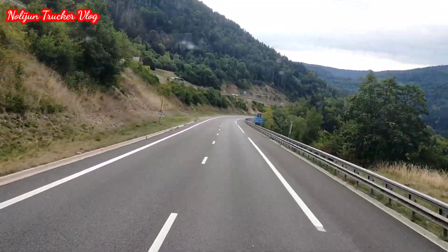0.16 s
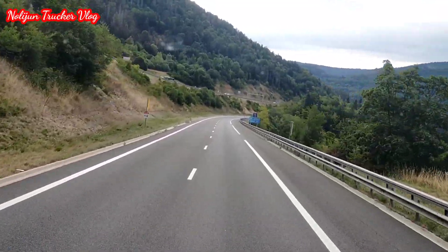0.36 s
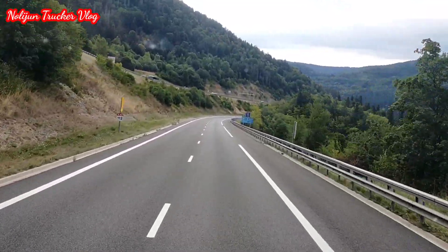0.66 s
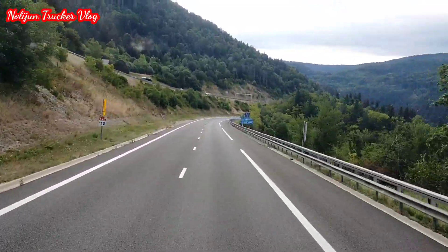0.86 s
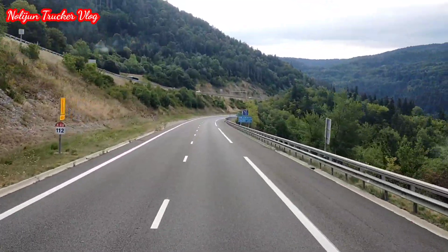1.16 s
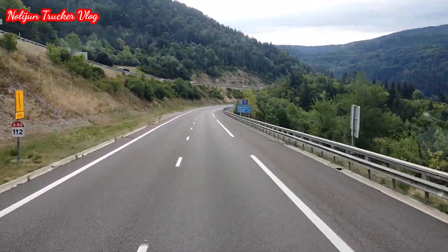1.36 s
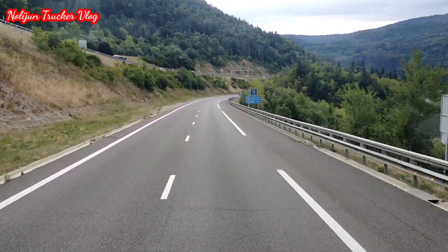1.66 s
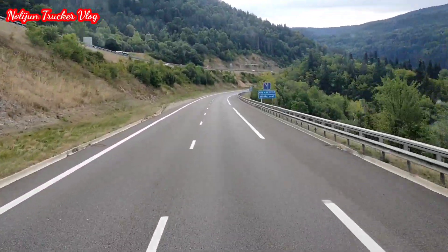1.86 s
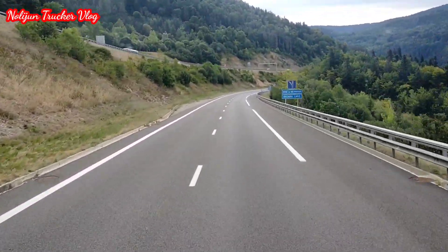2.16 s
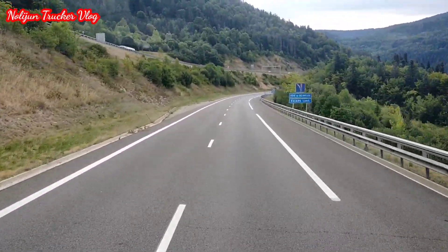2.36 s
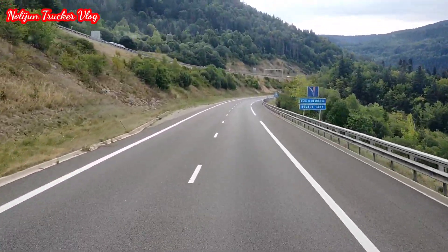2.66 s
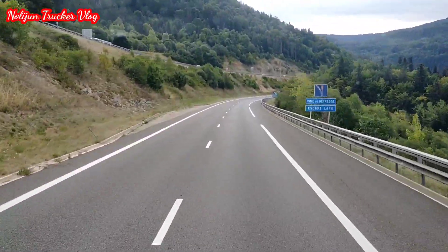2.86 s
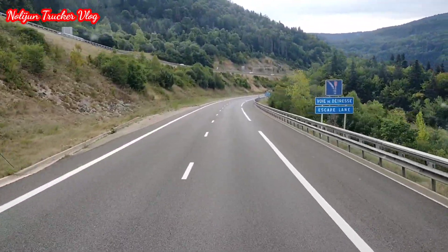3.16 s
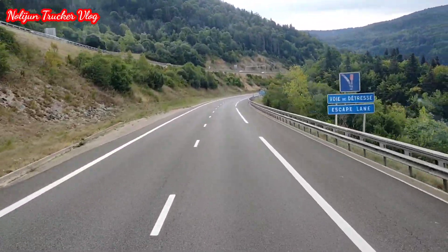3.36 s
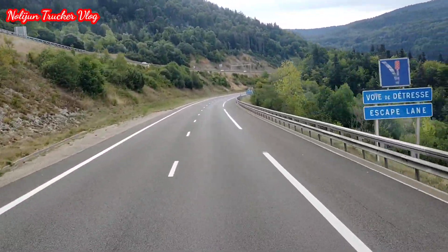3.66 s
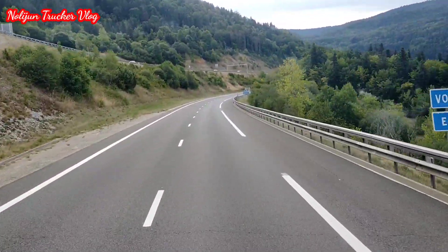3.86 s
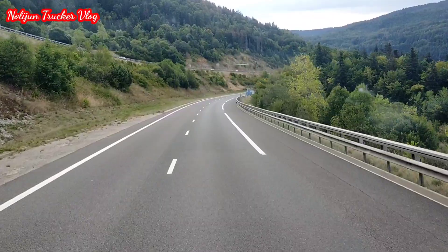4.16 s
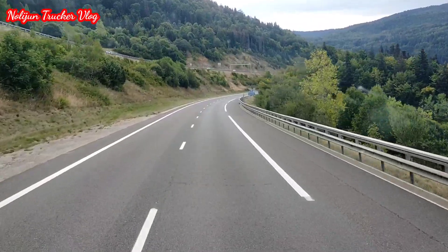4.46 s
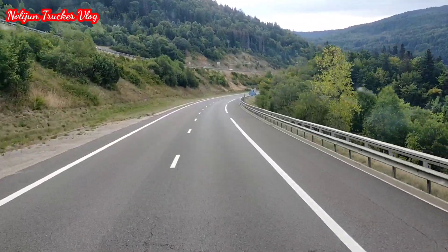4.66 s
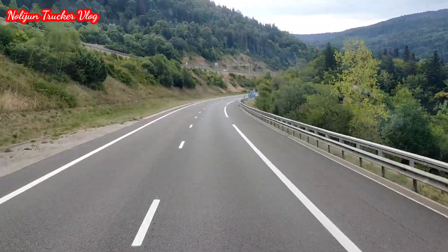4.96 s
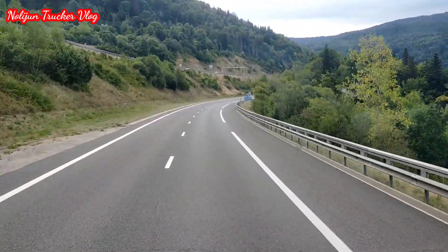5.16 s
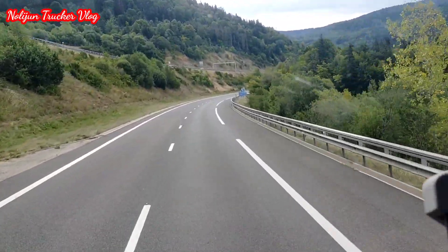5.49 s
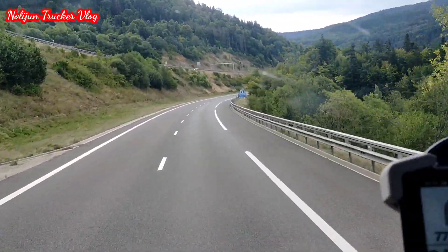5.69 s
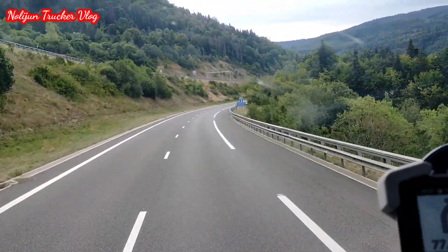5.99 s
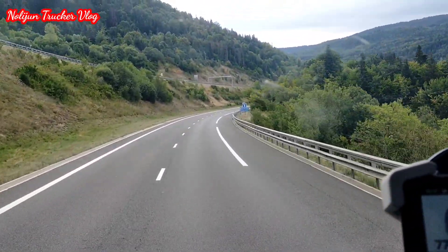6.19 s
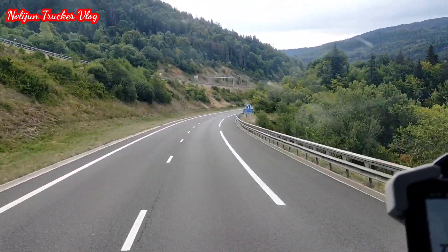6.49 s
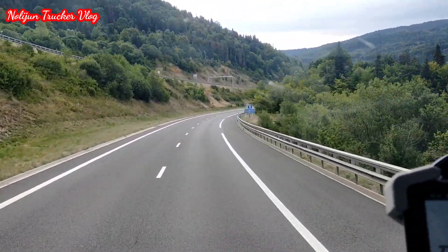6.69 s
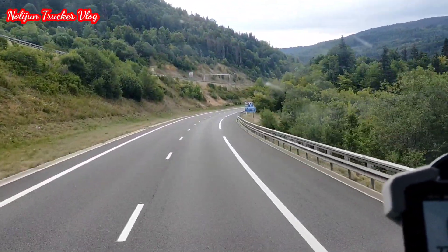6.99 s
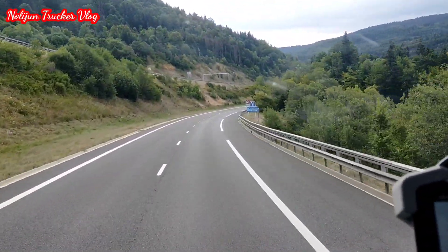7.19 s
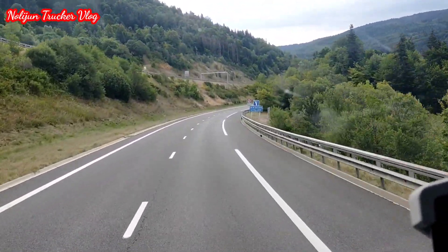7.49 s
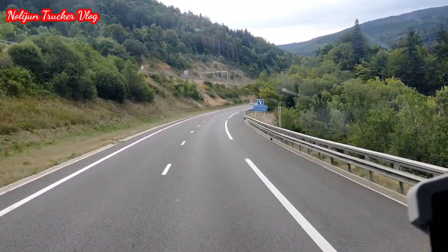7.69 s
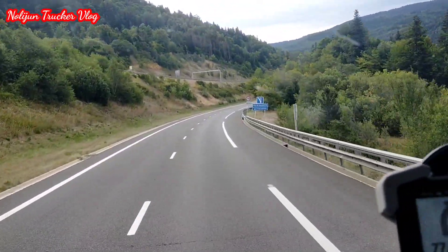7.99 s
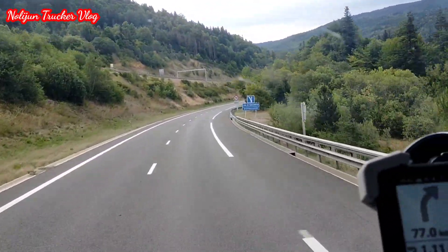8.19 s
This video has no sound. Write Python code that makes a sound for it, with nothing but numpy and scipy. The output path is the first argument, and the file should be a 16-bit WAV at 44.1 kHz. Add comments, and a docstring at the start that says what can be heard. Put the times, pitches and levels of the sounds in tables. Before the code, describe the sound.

Close cab interior, single-channel sound, windows apparently shut. Deep tyre and road rumble runs throughout. After an opening bump, the diesel's low boom lets go and its pitch sweeps upward for about a second, settling into a strong, buzzing engine-brake drone with muffled roar and mechanical clatter. Cloth-like rustles and scattered dry trim ticks sit close by, while gear whines swell faintly and road noise eases later.

```python
"""Inside the cab of a heavy truck rolling down a long hill: the tyres rumble, then ease on smoother asphalt.
A short burst of noise opens the scene; soft rustles follow as the diesel blips from about 1150 to 1900 rpm.
The engine brake builds to a steady drone with a thin turbo whistle, the driveline hums and trim ticks.
Hisses and rumbles are noise shaped by a spectrum; hums, whines and the drone are sines tied to speed."""
import sys
import numpy as np
from scipy import signal
from scipy.fft import rfft, irfft, next_fast_len
from scipy.io import wavfile
from scipy.ndimage import uniform_filter1d, map_coordinates

SR = 44100
rng = np.random.default_rng(int(sys.argv[2]) if len(sys.argv) > 2 else 0)


def digitize_waveform(pressure):
    """Quantize a signal to 16-bit integers and store it at the path in sys.argv[1].

    Rows of a 2-D input are taken as channels; values are limited to [-1, 1].
    """
    field = np.atleast_2d(pressure).T
    bounded = np.clip(field, -1, 1)
    quanta = np.round(bounded * 32767).astype(np.int16)
    wavfile.write(sys.argv[1], SR, quanta)


N = 367794
TIME = np.arange(N) / SR  # seconds

# Spectra of the noises, as shapes that are levelled later. Columns: pitch_hz, level_db (per Hz)
ROAD_SPECTRUM = [(15, -2.5), (28, -3), (42, -3.5), (70, -1.5), (100, -5.5), (140, -6.5), (180, -12),
                 (240, -16.5), (285, -22.5), (350, -20.5), (600, -26.5), (700, -28.5), (900, -28.5),
                 (1250, -31.5), (2500, -45), (4500, -62)]
AIR_SPECTRUM = [(4000, -12.5), (5000, -6.5), (6500, -5), (7500, -9), (9000, -15.5), (10500, -14.5),
                (13500, -11.5), (15500, -12)]
RUSTLE_SPECTRUM = [(2500, -14), (4500, 6.5), (7500, 8.5), (9500, -4), (13000, 0.5), (15500, -4),
                   (16500, -12)]
BURST_SPECTRUM = [(200, -11), (700, 1), (1300, -5), (2300, 0.5), (4000, -10), (6500, -17.5), (13000, -18),
                  (17000, -24)]
ROAR_SPECTRUM = [(60, -17), (110, -6.5), (140, -1), (180, -10), (270, -18), (340, -9), (530, -17),
                 (900, -18), (1100, -20.5), (1500, -23.5), (2200, -22), (2880, -22), (3150, -38),
                 (3700, -65)]
CLATTER_SPECTRUM = [(500, -15), (900, -1), (1250, -0.5), (1500, 0.5), (2000, -3), (2850, -8.5), (3450, -16),
                    (3900, -23), (4400, -28), (5200, -45)]
# Tyre tread and cab resonances. Columns: pitch_hz, half_width_hz, level_db (before the tread setting)
TYRE_RESONANCES = [(433.5, 11, -42), (600, 44, -49), (823, 20, -44.5), (925, 49, -42)]
# Driveline hum. Columns: multiple (of shaft speed), level_db (before the load)
SHAFT_LINES = [(1, -26), (2, -37.5), (3, -31.5), (4, -42.5)]
# Gear whines that swell and fade. Columns: multiple (of crankshaft speed), loudest_s, spread_s, level_db
GEAR_WHINES = [(48.86, 3.35, 1.16, -44), (52.1, 5.5, .7, -44), (51.7, 7.5, 0.75, -44)]
# Sputtering rustles. Columns: start_s, length_s, level_db (before fades and sputter), tilt_db_per_octave
RUSTLES = [(0.278, 0.13, -56.5, 8), (0.604, 0.27, -52.5, 10), (0.623, 0.067, -45, 10),
           (1.006, 0.21, -55.5, 7), (1.42, 0.032, -51, 6), (4.538, 0.1, -54, 8), (4.641, 0.11, -47.5, 16),
           (7.421, 0.18, -60, -2)]
# Louder ticks of loose trim. Columns: time_s, level_db (before the fade), centre_hz, half_width_octaves
TRIM_TICKS = [(.449, -52, 6500, .5), (.769, -47, 3500, .6), (.777, -40, 13500, .3), (.873, -49, 12000, .5),
              (1.036, -46, 11000, .55), (1.085, -39, 5800, .54), (1.434, -39.5, 7000, .7),
              (2.205, -46, 9000, .8), (2.63, -47, 8000, .8), (3.267, -45, 5400, .3),
              (4.577, -34.5, 7500, 1.0), (4.883, -41, 13500, .5), (5.086, -44, 6000, .25),
              (5.207, -37.5, 6300, 0.32), (6.397, -44, 6600, .2), (7.478, -44, 7500, .8),
              (7.936, -44, 14500, .25), (8.031, -40, 14500, .3), (8.16, -47, 13600, .25)]
# Bursts of fuel: the pull before the shift and the blip. Columns: start_s, rise_s, end_s, boom_db
FUEL_BURSTS = [(0, .02, .45, -20), (.96, 0.3, 1.276, -14.5)]
# Strong drone lines. Columns: multiple (of crankshaft speed), level_db (before the brake strength)
STRONG_LINES = [(2, -32), (2.5, -38.5), (3, -27), (4, -35), (4.5, -30.5), (5, -43), (5.5, -43), (6, -44),
                (7.5, -40), (9.5, -43), (12, -66), (13, -51.5), (14, -46.5), (15.5, -48.5), (18, -46.5),
                (21, -51), (23, -49), (28, -49.5), (32.5, -49), (33, -51.5), (36.5, -49)]
# Typical weaker drone lines. Columns: pitch_hz, level_db (before unevenness and brake strength)
WEAK_LINES = [(100, -57), (300, -49), (650, -55), (900, -56.5), (1300, -67), (2000, -61.5), (2900, -67),
              (3600, -70.5)]

# The downshift: the old gear lets go, the engine revs up, the lower gear takes hold
RELEASE_S, RELEASE_TAKES_S = 0.44, 0.22
REV_S, REV_TAKES_S = 0.95, 1.05
ENGAGE_S, ENGAGE_TAKES_S = 1.65, 0.2
# Engine speed before the shift and at its end, and shaft turns per second at its end
LOW_RPM, GEARED_RPM, SHAFT_HZ = 1152, 1910, 44.85
SPEED_GAIN_PER_S = 0.0058  # share of its speed that the truck gains each second on the slope
# The engine brake is fully open at BRAKE_S, then grows stronger as the turbo builds boost
BRAKE_S, BRAKE_OPENS_S, SPOOL_S = 1.29, 0.83, 1.43
BRAKE_DB, BRAKE_SHUT_DB, BRAKE_UNBOOSTED_DB = -1, -17, -8  # the last two are added to the first
TURBO_START_HZ, TURBO_TOP_HZ = 5950, 11980  # the whistle creeps towards the top
SMOOTH_S, SMOOTH_TAKES_S = 4.3, 0.85  # the tyres roll onto smoother asphalt
AIR_DB = -56
FAINT_TICKS_PER_S = 1.0
EDGE_HZ = 15600


def amp(db):
    """Turns decibels into a gain."""
    return 10 ** (np.asarray(db) / 20)


def evened(x):
    """Scales a signal to an rms (average strength) of 1."""
    return x / np.sqrt(np.mean(x ** 2) + 1e-20)


def ramp(start_s, takes_s):
    """Goes from 0 to 1 in a straight line, then holds."""
    return np.clip((TIME - start_s) / takes_s, 0, 1)


def add(mix, start_s, sound):
    """Mixes a sound in at its start time."""
    part = mix[max(round(start_s * SR), 0):][:len(sound)]
    part += sound[:len(part)]


def read(points, hz):
    """Reads a spectrum in dB between its points; it falls 40 dB per octave beyond its ends."""
    known_hz, db = np.transpose(points)
    octave, known = np.log2(hz + 1), np.log2(known_hz + 1)
    beyond = abs(octave - np.clip(octave, known[0], known[-1]))
    return np.interp(octave, known, db) - 40 * beyond


def hump(distance):
    """A rounded peak in dB: 0 at its centre and 6 dB lower at a distance of 1."""
    return -20 * np.log10(1 + distance ** 2)


def noise(colour, size=N):
    """Noise of rms 1 whose spectrum in dB is colour(hz)."""
    length = next_fast_len(size)
    hz = np.fft.rfftfreq(length, 1 / SR)
    spectrum = rfft(rng.standard_normal(length)) * amp(colour(hz))
    return evened(irfft(spectrum, length)[:size])


def drift(per_s):
    """A random wander of rms 1 that heads for a new value per_s times a second."""
    knots = rng.standard_normal(2048)
    return evened(np.interp(TIME * per_s, np.arange(len(knots)), knots))


def tone(hz, db, width_hz):
    """A sine on the curve hz whose timing wanders, smearing its pitch to about the given width."""
    wander = np.sqrt(2 * np.pi * abs(width_hz) / SR) * rng.standard_normal(N)
    phase = np.cumsum(2 * np.pi * hz / SR + uniform_filter1d(wander, size=200))
    return np.sqrt(2) * amp(db) * np.sin(phase)


def road_speed():
    """Speed relative to the end of the shift: the truck slowly gathers pace."""
    return 1 + SPEED_GAIN_PER_S * (TIME - REV_S - REV_TAKES_S)


def crank_rpm():
    """The engine revs up quickly, eases into the lower gear, then follows the road."""
    revved = 1 - (1 - ramp(REV_S, REV_TAKES_S)) ** 2
    return LOW_RPM + (GEARED_RPM * road_speed() - LOW_RPM) * revved


def spool_lag():
    """Share of the turbo boost still missing: 1 until the brake is open, then dying away."""
    return np.exp(-np.maximum(TIME - BRAKE_S, 0) / SPOOL_S)


def brake_db():
    """Strength of the engine brake: it opens during the shift and grows with boost."""
    shut = 1 - ramp(BRAKE_S - BRAKE_OPENS_S, BRAKE_OPENS_S)
    return BRAKE_DB + BRAKE_SHUT_DB * shut + BRAKE_UNBOOSTED_DB * spool_lag()


def rattle_db(pulling_db=-10.5, db_per_octave=4.5):
    """Valves and gears are quiet under pull, loosen as the gear lets go, and grow louder with speed."""
    pulling = 1 - ramp(RELEASE_S, RELEASE_TAKES_S)
    return pulling_db * pulling + db_per_octave * np.log2(crank_rpm() / GEARED_RPM)


def combustion(idle_db=-29, release_t60_s=0.25, idle_dies_s=0.36):
    """Gain of the boom: bursts of fuel swell and die; idling fades out once the brake is open."""
    gain = amp(idle_db) * (1 - ramp(BRAKE_S, idle_dies_s))
    for start_s, rise_s, end_s, db in FUEL_BURSTS:
        dying_db = -60 * np.maximum(TIME - end_s, 0) / release_t60_s
        gain = gain + ramp(start_s, rise_s) * amp(db + dying_db)
    return gain


def road(rumble_db=-20.5, tread_db=0.84, smooth_rumble_db=-2, smooth_tread_db=-4.0):
    """Tyre rumble swells over the uneven surface, with a fuzzy tread hum; both ease on smoother asphalt."""
    bumps_db = 0.6 * drift(8)
    smooth = ramp(SMOOTH_S, SMOOTH_TAKES_S)
    rumble_gain = amp(rumble_db + smooth_rumble_db * smooth + bumps_db)
    rumble = rumble_gain * noise(lambda hz: read(ROAD_SPECTRUM, hz))
    tread = np.zeros(N)
    for centre, width, db in TYRE_RESONANCES:
        tread += amp(db) * noise(lambda hz: hump((hz - centre) / width))
    return rumble + amp(tread_db + smooth_tread_db * smooth) * tread


def airflow(follow=0.75, whistle_db=-68.0, whistle_s=2.9, whistle_grows_s=2.0, waver_db=2, flutter_hz=110):
    """A faint hiss grows with the engine's rattle; the turbo whistle climbs in pitch with boost."""
    hiss = amp(AIR_DB + follow * rattle_db()) * noise(lambda hz: read(AIR_SPECTRUM, hz))
    turbo_hz = TURBO_TOP_HZ + (TURBO_START_HZ - TURBO_TOP_HZ) * spool_lag()
    # multiplying by slow noise makes the whistle breathy
    flutter = noise(lambda hz: hump(hz / flutter_hz))
    whistle = np.sqrt(2) * flutter * np.sin(2 * np.pi * np.cumsum(turbo_hz) / SR)
    whistle_gain = ramp(whistle_s, whistle_grows_s) * amp(whistle_db + waver_db * drift(5))
    return hiss + whistle_gain * whistle


def narrow_hiss(db=-54.5, pulling_db=-11, hold_s=1.75, fade_db_per_s=-16, centre_hz=3380, width_hz=520):
    """A narrow band of hiss near 3.4 kHz lasts through the shift and fades afterwards."""
    pulling = 1 - ramp(RELEASE_S, RELEASE_TAKES_S)
    fade_db = fade_db_per_s * np.maximum(TIME - RELEASE_S - hold_s, 0)
    band = noise(lambda hz: hump(((hz - centre_hz) / width_hz) ** 2))
    return amp(db + pulling_db * pulling + fade_db) * band


def trim(t60_s=0.0098, rise_s=0.0016, ring_db=-17, ring_t60_s=0.18, body_db=-2, body_hz=3400,
         bounce_s=0.008, bounce_db=-7, faint_db=-54, faint_width=0.5):
    """Plastic parts tap and bounce once: a quick tick, the panel's body and a faint ring of the cab."""
    out, t = np.zeros(N), TIME[:SR // 10]
    tap = amp(-60 * np.maximum(t - rise_s, 0) / t60_s)
    ring = amp(ring_db - 60 * t / ring_t60_s)
    fade = np.minimum(t / rise_s, 1) * (tap + ring)
    fade = np.hypot(fade, amp(bounce_db) * np.interp(t - bounce_s, t, fade))
    # faint ticks fall at random times and pitches
    chance = rng.random((round(FAINT_TICKS_PER_S * N / SR), 2))
    faint = [(when * N / SR, faint_db, 5500 * 2 ** octave, faint_width) for when, octave in chance]
    for time_s, db, centre, width in TRIM_TICKS + faint:
        tick = noise(lambda hz: hump(np.log2((hz + 1) / centre) / width), size=len(t))
        body = noise(lambda hz: hump(2 * np.log2((hz + 1) / body_hz)), size=len(t))
        add(out, time_s - rise_s, amp(db) * fade * (tick + amp(body_db) * body))
    return out


def thump(start_s=0.0169, db=-12, hz=82, t60_s=0.47):
    """A low bump rings briefly in the cab: a dying sine."""
    t = np.maximum(TIME - start_s, 0)
    return amp(db - 60 * t / t60_s) * np.sin(2 * np.pi * hz * t)


def burst(db=-14.0, t60_s=0.081):
    """A short burst of noise opens the scene and dies quickly."""
    return amp(db - 60 * TIME / t60_s) * noise(lambda hz: read(BURST_SPECTRUM, hz))


def rustles(sputter_db=2.5):
    """Short sputtering rustles, like a hand or cloth rubbing: bright noise with a rapidly jumping level."""
    out = np.zeros(N)
    for start_s, length_s, db, tilt in RUSTLES:
        size = int(length_s * SR)
        rustle = noise(lambda hz: read(RUSTLE_SPECTRUM, hz) + tilt * np.log2(hz + 1), size=size)
        add(out, start_s, amp(db) * rustle * signal.windows.tukey(size, 0.7))
    return out * amp(sputter_db * drift(120))


def driveline(unloaded_db=-20, settle_db_per_s=-1.03):
    """The shaft hum rises as the gear takes hold and beats against the engine lines; gears whine."""
    crank_hz = crank_rpm() / 60
    out = np.zeros(N)
    for multiple, loudest_s, spread_s, db in GEAR_WHINES:
        swell = np.exp(-((TIME - loudest_s) / spread_s) ** 2 / 2)
        out += swell * tone(multiple * crank_hz, db, width_hz=10.83)
    unloaded = 1 - ramp(ENGAGE_S, ENGAGE_TAKES_S)
    load_db = unloaded_db * unloaded + settle_db_per_s * np.maximum(TIME - ENGAGE_S, 0)
    for multiple, db in SHAFT_LINES:
        out += tone(multiple * SHAFT_HZ * road_speed(), db + load_db, width_hz=0.058 * multiple ** 2)
    return out


def drone(turns, rpm, waver=0.74, uneven_db=3):
    """Unequal cylinders repeat every two turns, giving lines at half multiples; each wavers by itself."""
    multiples = np.arange(3, 210) / 2
    heights = read(WEAK_LINES, multiples * np.median(rpm) / 60)
    heights = heights + uneven_db * rng.uniform(-1, 1, len(multiples))
    for multiple, db in STRONG_LINES:
        heights[np.argmin(abs(multiples - multiple))] = db
    # each engine cycle (two turns) is one spectrum, with random changes that carry over to the next
    cycles, size = int(turns[-1] / 2) + 8, 2048
    shape = (len(multiples), cycles)
    chance = rng.standard_normal(shape) + 1j * rng.standard_normal(shape)
    chance = signal.lfilter([0.6], [1, -0.8], chance, axis=1)
    start = np.exp(2j * np.pi * rng.random((len(multiples), 1)))
    lines = np.zeros((size // 2 + 1, cycles), complex)
    lines[(2 * multiples).astype(int)] = amp(heights)[:, None] * (start + waver * chance)
    waves = irfft(lines, axis=0) * size / np.sqrt(2)
    # play the waves at engine speed, blending neighbouring cycles
    place = [turns / 2 % 1 * size, turns / 2]
    return map_coordinates(waves, place, order=1, mode="grid-wrap")


def engine(roar_db=-28, clatter_db=-36.0, chuff=0.12, lope=0.025, boom_overtone_db=-19,
           shake_db=-28.0, shake_growth=0.11):
    """Three of six cylinders vent on every turn: a boom, a drone, a roar, and clatter pulsing in step."""
    rpm, braking_db = crank_rpm(), brake_db()
    turns = np.cumsum(rpm) / 60 / SR
    firing = 2 * np.pi * 3 * turns  # angle that goes round once per cylinder
    uneven = lope * np.cos(firing / 2) + lope * np.cos(np.pi * turns)
    pulsing = evened(1 + chuff * np.cos(firing) + uneven)
    boom_wave = np.sin(firing) + amp(boom_overtone_db) * np.sin(2 * firing)
    boom = np.sqrt(2) * combustion() * amp(drift(10.5)) * boom_wave
    # the front and rear three cylinders differ, which shakes the cab at half the firing rate
    shake_gain = amp(shake_db + shake_growth * braking_db + drift(1.86))
    shake = np.sqrt(2) * shake_gain * np.sin(firing / 2)
    roar = amp(roar_db) * noise(lambda hz: read(ROAR_SPECTRUM, hz))
    clatter_gain = amp(clatter_db + rattle_db() + 0.82 * drift(25))
    clatter = clatter_gain * noise(lambda hz: read(CLATTER_SPECTRUM, hz))
    braking = amp(braking_db) * (drone(turns, rpm) + roar * pulsing)
    return boom + shake + braking + clatter * pulsing


def scene():
    """Everything as heard behind the windscreen, in one channel."""
    background = road() + airflow() + narrow_hiss()
    events = trim() + thump() + burst() + rustles()
    return (background + events + driveline() + engine())[None]


def record(dry):
    """Cuts the treble off steeply around EDGE_HZ."""
    low_pass = signal.firwin(511, EDGE_HZ, window=("kaiser", 9), fs=SR)
    return signal.oaconvolve(dry, low_pass[None], "same")


dry = scene()
out = record(dry)
digitize_waveform(out)
```